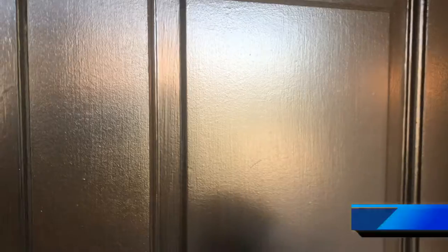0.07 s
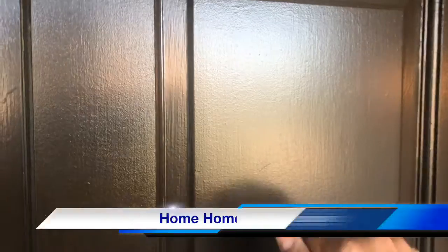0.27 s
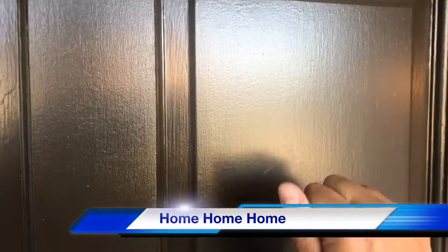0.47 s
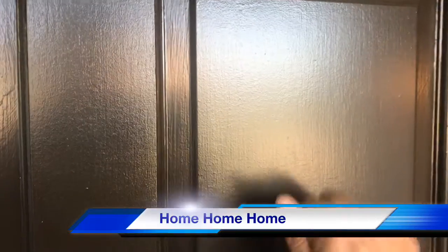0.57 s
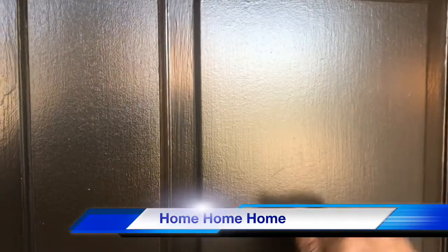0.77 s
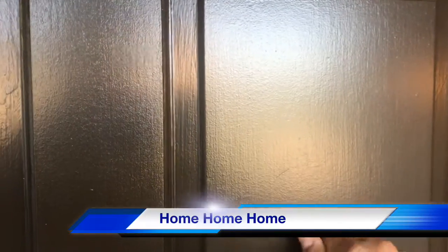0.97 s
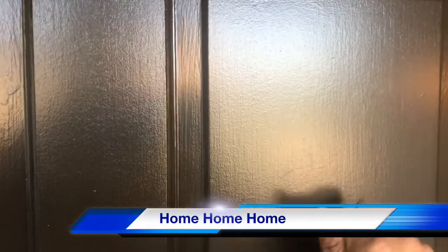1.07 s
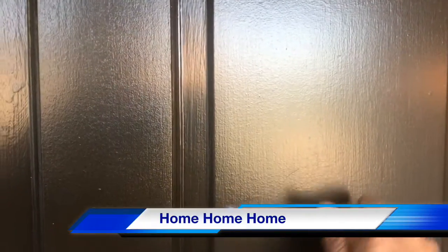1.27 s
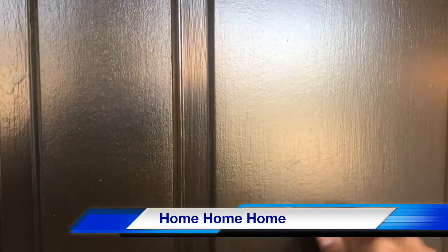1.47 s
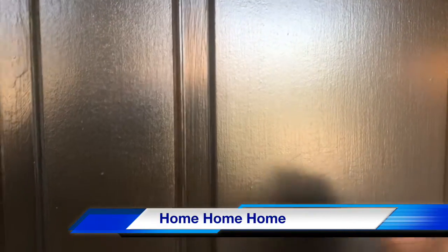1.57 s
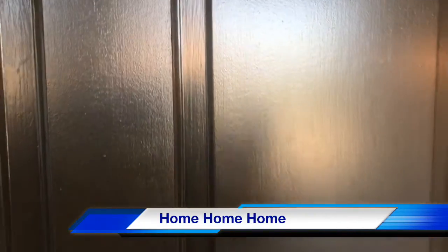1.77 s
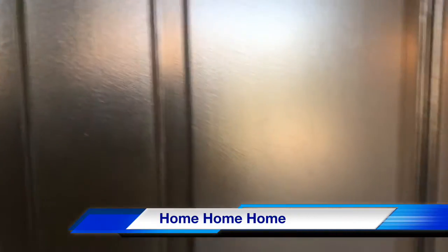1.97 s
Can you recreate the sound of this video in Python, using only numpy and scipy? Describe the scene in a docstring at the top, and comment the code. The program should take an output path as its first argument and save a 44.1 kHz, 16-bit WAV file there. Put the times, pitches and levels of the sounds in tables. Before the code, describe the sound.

Four quick knuckle knocks on a panelled wooden door, the first softer and duller, the rest loud and booming, with slight latch rattle; faint birds and quiet outdoor rumble, miked close on a porch.

```python
"""Four knuckle knocks on a panelled wooden front door, heard close by from the porch.
Each sends a bending wave through the panel, rings its modes and sets the whole leaf booming,
with a dense noise tail for door and porch. The latch rattles in short buzzes of tiny contacts.
Soft bumps ring dully, and a sleeve rustles faintly as filtered noise.
Small birds chirp in arched tones over a faint outdoor rumble of filtered noise."""
import sys
import numpy as np
from scipy import signal
from scipy.fft import rfft, irfft
from scipy.io import wavfile
from scipy.ndimage import uniform_filter1d, minimum_filter1d

SR = 44100
rng = np.random.default_rng(int(sys.argv[2]) if len(sys.argv) > 2 else 0)


def generate_wav(signal):
    """Clip the signal to [-1, 1] and save it as 16-bit WAV at the path in sys.argv[1]."""
    frames = np.transpose(np.atleast_2d(signal))
    scaled = np.clip(frames, -1, 1) * 32767
    pcm = np.round(scaled).astype(np.int16)
    wavfile.write(sys.argv[1], SR, pcm)


N = 88640  # length in samples
T = np.arange(N) / SR  # time axis, s
HZ = np.maximum(np.arange(N + 1) * SR / (2 * N), 1)  # frequency axis of the zero-padded spectra


def from_db(db):
    """Decibels to gain."""
    return 10 ** (np.asarray(db) / 20)


def rms(x):
    """Root mean square."""
    return np.sqrt(np.mean(x ** 2) + 1e-20)


def at_hz(points, hz):
    """Read a table on a log-frequency axis."""
    f, value = np.transpose(points)
    return np.interp(np.log(hz), np.log(f), value)


def causal(db):
    """Minimum-phase response with these levels: nothing sounds early."""
    cepstrum = irfft(np.log(from_db(db)))
    folded = np.r_[cepstrum[0], 2 * cepstrum[1:N]]
    return np.exp(rfft(folded, 2 * N))


def colour(x, db):
    """Filter by a level for each frequency."""
    return irfft(rfft(x, 2 * N) * causal(db))[:N]


def convolve(x, response):
    """Play a sound through an impulse response."""
    return signal.fftconvolve(x, response)[:N]


def delayed(x, s):
    """Start a sound at the given time."""
    return np.interp(T - s, T, x, left=0)


def dying(t60):
    """Exponential decay that falls 60 dB in t60 seconds."""
    return from_db(-60 * T / t60)


# Colour of the outdoor background: (frequency [Hz], relative level [dB per Hz])
AIR_COLOUR = [(12, -55), (24, -35), (45, -0.5), (75, -0.5), (120, -6.5), (200, -7.5), (300, -17.5),
              (700, -18.5), (1100, -20.5), (1700, -29.5), (4500, -34), (8000, -42.5), (16000, -44)]
AIR_DB, AIR_START_S, AIR_FADE_S = -50, 0.11, 0.058  # level once faded in


def air():
    """Distant rumble and hiss: coloured noise, fading in at the start."""
    fade = np.clip((T - AIR_START_S) / AIR_FADE_S, 0, 1) ** 2
    noise = colour(rng.standard_normal(N), at_hz(AIR_COLOUR, HZ))
    return from_db(AIR_DB) * fade * noise / rms(noise)


# Arched chirp before scaling: (time from its start [s], pitch [Hz], level [dB])
CHIRP_ARCH = [(0, 4880, -14), (.008, 5370, -12), (0.018, 5430, -4.5), (.026, 5050, -7), (.036, 4600, -10.5),
              (.05, 4200, -11.5), (0.06, 3430, -30)]
# Each chirp: (time [s], level [dB], pitch ratio, length ratio, fading [dB per s of unscaled arch])
CHIRP_CALLS = [(0.372, -45.5, 0.99, 1.28, 20), (.393, -51, 1.01, 1.26, 60), (.423, -44.5, 1.04, 0.55, 198),
               (0.911, -48.5, 1, 0.67, 497), (0.931, -47, .78, 0.74, 260), (1.774, -37.5, 0.99, .9, 254)]
GARDEN_DB, GARDEN_T60_S = -3, 0.32


def birds():
    """Thin arched chirps: gliding sine tones, scattered by the garden as a decaying noise tail."""
    arch_s, arch_hz, arch_db = np.transpose(CHIRP_ARCH)
    song = 0
    for s, db, pitch, length, fading in CHIRP_CALLS:
        age = (T - s) / length
        hz = pitch * np.interp(age, arch_s, arch_hz)
        phase = 2 * np.pi * np.cumsum(hz) / SR
        gains = from_db(db + arch_db - fading * arch_s)
        song = song + np.sin(phase) * np.interp(age, arch_s, gains, left=0, right=0)
    scatter = rng.standard_normal(N) * dying(GARDEN_T60_S)
    scatter = scatter / np.linalg.norm(scatter)
    return song + from_db(GARDEN_DB) * convolve(song, scatter)


# Colour of the brushing sleeve: (frequency [Hz], relative level [dB per Hz])
SLEEVE_COLOUR = [(300, -15), (800, 3.5), (2000, -12.5), (4000, -14.5), (9000, -19), (16000, -24)]
RUSTLE_S, RUSTLE_HALF_S, RUSTLE_DB = 1.693, 0.24, -57.5  # centre, half length, peak level


def rustle():
    """A sleeve brushes faintly as the arm draws back: coloured noise that swells and sinks."""
    swell = np.exp(-((T - RUSTLE_S) / RUSTLE_HALF_S) ** 2)
    noise = colour(rng.standard_normal(N), at_hz(SLEEVE_COLOUR, HZ))
    return from_db(RUSTLE_DB) * swell * noise / rms(noise)


# Soft, dull bumps: (time [s], level [dB])
BUMP_TIMES = [(1.001, -51.5), (1.748, -43.5)]
# Resonances of a bump: (frequency [Hz], level [dB])
BUMP_RESONANCES = [(590, -2), (675, 2), (740, 3), (1110, -7.5)]
BUMP_T60_S, BUMP_ATTACK_S = 0.11, 0.005


def bumps():
    """Soft, dull bumps: a few resonances with a rounded attack that ring only briefly."""
    ring = sum(from_db(db) * np.sin(2 * np.pi * hz * T) for hz, db in BUMP_RESONANCES)
    bump = ring * dying(BUMP_T60_S) * (1 - np.exp(-T / BUMP_ATTACK_S))
    return sum(from_db(db) * delayed(bump, s) for s, db in BUMP_TIMES)


# Buzzes of the leaf in its latch: (time [s], level [dB], half length [s])
LATCH_BUZZES = [(0.734, -53, 0.0016), (0.781, -41, 0.0033), (1.0654, -28.5, 0.004), (1.075, -39, 0.0048),
                (1.13, -51, 0.0086), (1.162, -42, 0.0046), (1.304, -36, 0.004), (1.326, -37.5, 0.001),
                (1.372, -42, 0.0042), (1.384, -43.5, 0.0023), (1.402, -40.5, 0.0039),
                (1.527, -33.5, 0.0038), (1.592, -41.5, 0.0044), (1.603, -44, 0.0045), (1.624, -39, 0.0025),
                (1.654, -52, 0.0017)]
# Colour of the latch: (frequency [Hz], relative level [dB per Hz])
LATCH_COLOUR = [(800, -22), (1600, 4), (2400, 3.5), (3200, -3), (4700, 3), (6300, 2), (8000, -5.5),
                (11500, -7), (16000, -12.5)]
LATCH_DB, CONTACTS_PER_S = -2, 5000
LATCH_RING_DB, LATCH_T60_S = -10.5, 0.12


def latch():
    """The leaf rattles: short buzzes of tiny random contacts, each buzz with a brief noisy ring."""
    power = sum(from_db(db) ** 2 * np.exp(-((T - s) / half) ** 2) for s, db, half in LATCH_BUZZES)
    ring_power = convolve(power, dying(LATCH_T60_S) ** 2) / (SR * 0.0057)
    contacts = rng.standard_normal(N) * (rng.random(N) < CONTACTS_PER_S / SR)
    buzz = contacts / rms(contacts) * np.sqrt(power)
    # convolution can round just below zero, hence abs
    ring = from_db(LATCH_RING_DB) * rng.standard_normal(N) * np.sqrt(np.abs(ring_power))
    shape_db = at_hz(LATCH_COLOUR, HZ)
    return from_db(LATCH_DB) * colour(buzz + ring, shape_db) / rms(from_db(shape_db))


# Colour of the door and porch reverberation: (frequency [Hz], relative level [dB per Hz])
PORCH_COLOUR = [(40, -35), (140, -25), (260, 7), (650, 22), (1150, 11), (1500, -17), (2200, -4),
                (3000, -17), (6000, -42), (16000, -47)]
# Its decay: (frequency [Hz], t60 [s])
PORCH_DECAY = [(100, 0.39), (300, 0.5), (700, 0.32), (1400, 0.24), (3000, 0.23), (10000, 0.17)]
PORCH_DB, PORCH_BUILD_S = -26, 0.018


def porch():
    """A dense tail of noise bands, each with its own decay, that mostly dies sooner in the treble."""
    tail = 0
    edges = np.geomspace(30, 18000, 19)
    for low, high in zip(edges, edges[1:]):
        band_filter = signal.butter(2, [low, high], "band", fs=SR, output="sos")
        band = signal.sosfilt(band_filter, rng.standard_normal(N))
        tail = tail + band * dying(at_hz(PORCH_DECAY, np.sqrt(low * high)))
    build = 1 - np.exp(-(T / PORCH_BUILD_S) ** 2)
    shape_db = at_hz(PORCH_COLOUR, HZ)
    return from_db(PORCH_DB) * colour(tail * build, shape_db) / rms(from_db(shape_db))


# Slow swings of the whole leaf: (frequency [Hz], level [dB], swell [s], t60 [s])
LEAF_SWINGS = [(74.9, -14.5, 0.069, 0.43), (44.6, -24.5, 0.027, 0.34), (88.8, -27.5, 0.01, 0.58),
               (118.4, -33, 0.055, 0.46)]


def boom():
    """The whole leaf swells into a low swing, then dies away."""
    swings = 0
    for hz, db, swell, t60 in LEAF_SWINGS:
        decay = dying(t60) / from_db(-60 * swell / t60)  # unity when the swell ends
        envelope = np.minimum(T / swell, decay)
        swings = swings + from_db(db) * np.sin(2 * np.pi * hz * T) * envelope
    return swings


# Ringing modes of the panels: (frequency [Hz], relative level [dB], t60 before damping [s])
PANEL_MODES = [(158, -30.5, 0.37), (215.2, -10, 0.14), (265, -24.5, 0.46), (289, -33, 0.68),
               (327, -20.5, 0.17), (332.2, -19, 0.12), (346.3, -24, 0.38), (373.9, -22, 0.33),
               (431.7, -18, 0.21), (485.6, -38, 0.49), (492.7, -28, 0.28), (540, -28, 0.26),
               (576, -23, 0.23), (605.6, -18.5, 0.098), (633, -22.5, 0.24), (659, -27, 0.28),
               (705.8, -23, 0.2), (739, -23, 0.24), (797.4, -18, 0.093), (825, -30.5, 0.31),
               (850, -34, 0.073), (927.4, -18, 0.16), (955, -31, 0.069), (996, -19, 0.12), (1028, -36, 0.2),
               (1114, -30, 0.25), (1178, -30.5, 0.17), (1190, -30.5, 0.25), (1325, -40.5, 0.28),
               (1352, -27.5, 0.11), (1394, -26, 0.095), (1527.1, -37, 0.2), (1557.2, -32.5, 0.13),
               (1616, -41, 0.19), (1700, -33.5, 0.098), (1792, -37.5, 0.13)]
PANEL_DB, PANEL_DAMPING = 1, 1.05  # damping divides every t60
PANEL_BUILD_S, PANEL_DELAY_S = 0.004, 0.003


def panel():
    """The panel modes build up as the wave reflects from the frame."""
    rings = 0
    for k, (hz, db, t60) in enumerate(PANEL_MODES):
        sign = (-1) ** k  # neighbouring modes start in opposite directions
        rings = rings + sign * from_db(db) * np.sin(2 * np.pi * hz * T) * dying(t60 / PANEL_DAMPING)
    build = 1 - np.exp(-T / PANEL_BUILD_S)
    return from_db(PANEL_DB) * delayed(rings * build, PANEL_DELAY_S)


# First bending wave from the knuckle: (frequency [Hz], relative level [dB])
THUMP_COLOUR = [(60, -67.5), (140, -6.5), (220, -8), (310, 3.5), (440, -8), (550, 0.5), (720, -10),
                (900, -5), (1020, -12), (1190, -2.5), (1320, -20), (1410, -11), (1550, -29), (2200, -32),
                (2600, -64), (3200, -51), (5000, -66), (16000, -71)]
THUMP_DB = 37
TRAVEL_S = 0.001691  # travel time of the wave at 1 kHz


def thump():
    """Bending waves travel faster at high pitch, so the blow arrives as a very quick downward sweep."""
    # this phase delays each frequency by TRAVEL_S * sqrt(1000 / HZ)
    phase = 4 * np.pi * TRAVEL_S * np.sqrt(1000 * HZ)
    blow = causal(THUMP_DB + at_hz(THUMP_COLOUR, HZ))
    return -irfft(blow * np.exp(-1j * phase))[:N]


# Knuckle knocks: (time [s], level at 500 Hz without boom [dB], brightness [dB per octave], boom [dB])
KNOCK_HITS = [(0.7708, -7, -3, -12), (1.0514, -0.5, 0, -3.5), (1.2954, -1.5, -1, 0), (1.5192, 1, 1, 1.5)]


def knocks():
    """Every knock strikes the same spot; harder ones are brighter."""
    wood = thump() + panel() + porch()
    leaf = boom()
    octaves = np.log2(np.clip(HZ, 200, 3000) / 500)  # brightness tilts around 500 Hz
    hits = 0
    for s, db, bright, boom_db in KNOCK_HITS:
        knock = colour(wood, db + bright * octaves) + from_db(boom_db) * leaf
        hits = hits + delayed(knock, s)
    return hits


def scene():
    """Door, latch and garden at one microphone."""
    return (air() + birds() + rustle() + bumps() + latch() + knocks())[None]


LOW_CUT_HZ, CUTOFF_HZ = 30, 16000
CEILING = 0.99  # limiter threshold, full scale = 1
LIMIT_AHEAD_S, RELEASE_DB_PER_S = 0.0015, 600


def record(dry):
    """The deepest bass is lost, a fast limiter holds the peaks of the knocks, and the top is cut."""
    low_cut = signal.butter(4, LOW_CUT_HZ, "high", fs=SR, output="sos")
    dry = signal.sosfilt(low_cut, dry)
    over_db = 20 * np.log10(np.maximum(np.abs(dry[0]) / CEILING, 1))
    # instant attack, steady release
    release = RELEASE_DB_PER_S * T
    cut_db = np.maximum.accumulate(over_db + release) - release
    # look ahead, then smooth twice
    size = int(LIMIT_AHEAD_S * SR)
    held_db = minimum_filter1d(-cut_db, 2 * size)
    gain = from_db(uniform_filter1d(uniform_filter1d(held_db, size), size))
    top_cut = signal.ellip(10, 0.2, 80, CUTOFF_HZ, fs=SR, output="sos")
    return signal.sosfilt(top_cut, dry * gain)


dry = scene()
out = record(dry)
generate_wav(out)
```